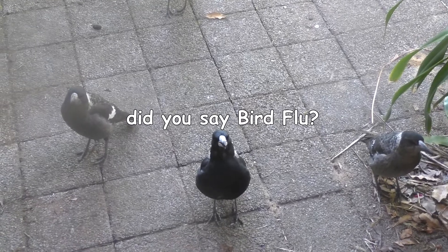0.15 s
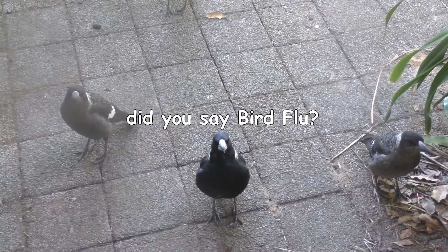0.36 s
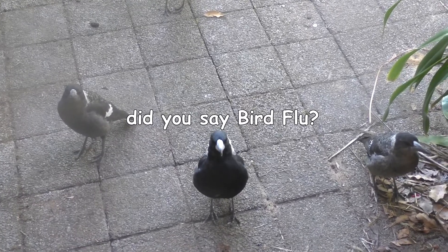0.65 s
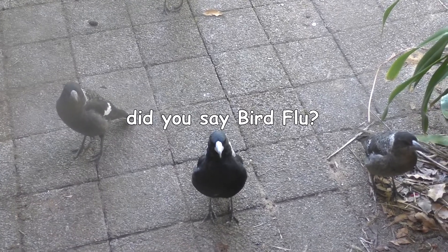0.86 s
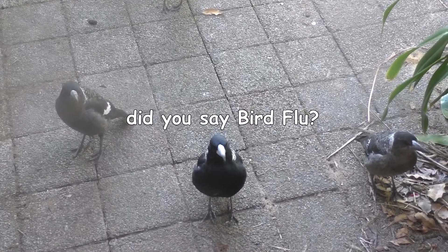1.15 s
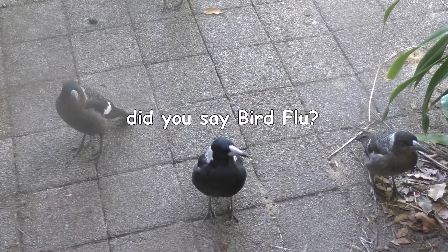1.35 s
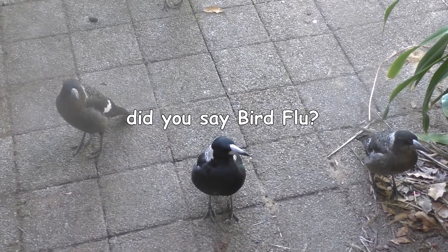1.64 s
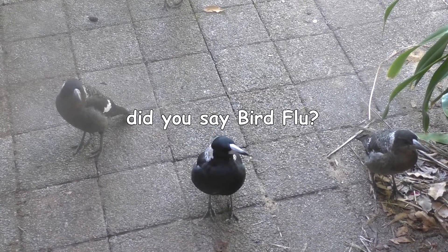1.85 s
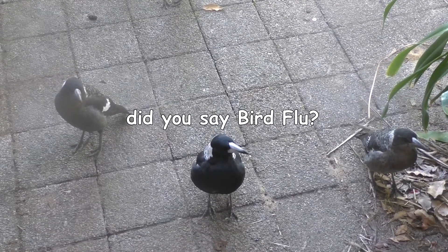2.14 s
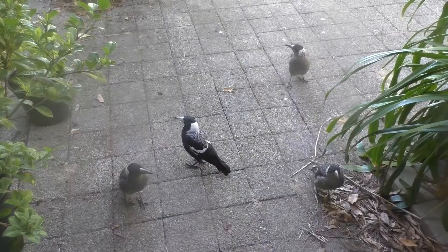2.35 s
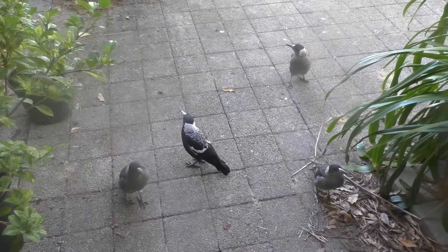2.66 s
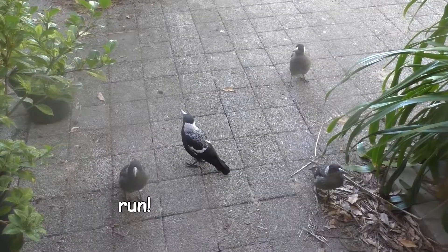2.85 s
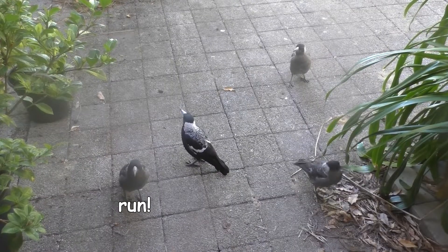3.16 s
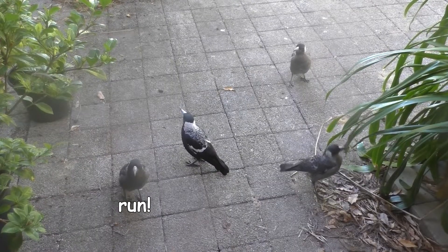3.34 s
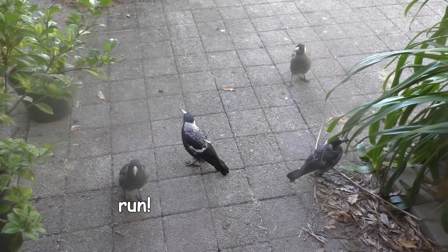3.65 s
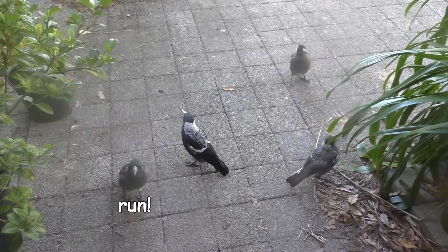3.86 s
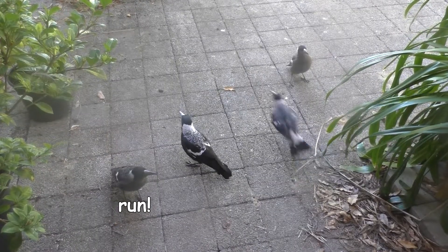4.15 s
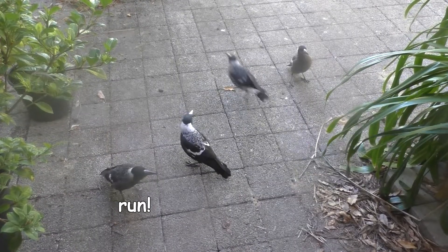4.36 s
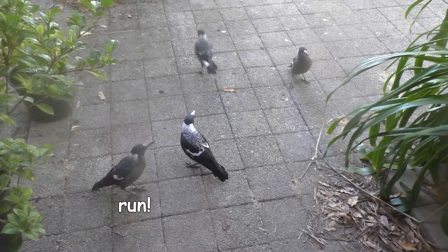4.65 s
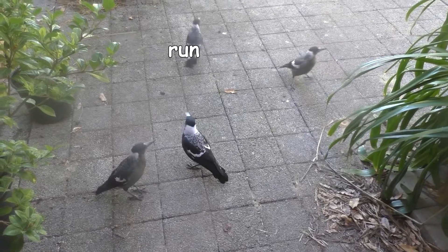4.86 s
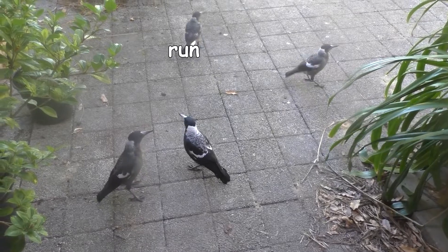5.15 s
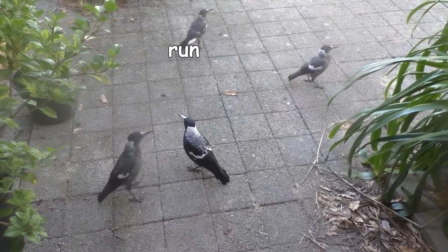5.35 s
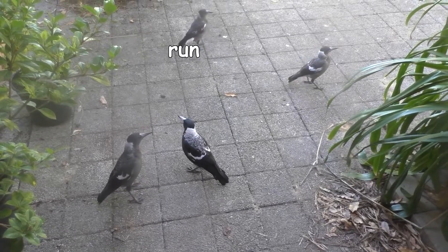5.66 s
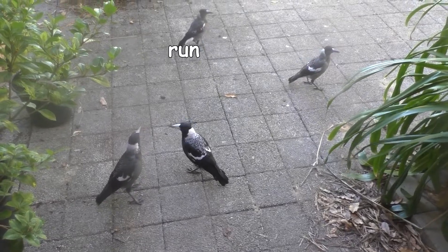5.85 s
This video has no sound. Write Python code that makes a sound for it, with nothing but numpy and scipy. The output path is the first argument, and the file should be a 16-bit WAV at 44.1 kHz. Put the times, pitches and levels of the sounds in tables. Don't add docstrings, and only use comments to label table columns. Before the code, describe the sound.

On a paved yard, a magpie already mid-song gives a loud fluty trill, then softer short whistles sliding lower, two close pitches beating together. Distant traffic and hiss rise after it, and a young bird gives one faint husky call. The sound cuts suddenly to a steady, low idling engine; dry leaves crackle and small twigs snap as a bird scuffles away, with faint distant whistles. Ordinary camera microphone, slightly grainy.

```python
import sys
import numpy as np
from scipy import signal
from scipy.fft import rfft, irfft, dct, next_fast_len
from scipy.io import wavfile
from scipy.ndimage import uniform_filter1d, map_coordinates

SR = 44100
rng = np.random.default_rng(int(sys.argv[2]) if len(sys.argv) > 2 else 0)


def output_pcm(signal):
    pcm = np.clip(np.atleast_2d(signal).T, -1, 1) * 32767
    wavfile.write(sys.argv[1], SR, np.round(pcm).astype(np.int16))


def amplitude_ratio(level_db):
    exponent = np.asarray(level_db, float) / 20
    return 10 ** exponent


N = 264776
CUT_S = 2.3
TOP_HZ = 15750


def unit(x):
    return x / np.sqrt(np.mean(x ** 2) + 1e-20)


def curves(rows, t):
    s, *cols = np.transpose(rows)
    return [np.interp(t, s, c) for c in cols]


def wobble(rate, size):
    knots = rng.standard_normal(int(size * rate / SR) + 4)
    return map_coordinates(knots, [np.arange(size) * rate / SR])


def filtered(x, response):
    m = next_fast_len(len(x) + 8192)
    return irfft(rfft(x, m) * response(np.fft.rfftfreq(m, 1 / SR)), m)[:len(x)]


def coloured(x, spectrum):
    f, db = np.transpose(spectrum)
    return unit(filtered(x, lambda hz: amplitude_ratio(np.interp(np.log(hz + 1), np.log(f), db))))


def rush(spectrum, patchy_db):
    z = signal.stft(rng.standard_normal(N + 512), nperseg=512)[2]
    field = uniform_filter1d(rng.standard_normal(z.shape), 3, 0)
    field = uniform_filter1d(field, 14, 1)
    patchy = signal.istft(z * amplitude_ratio(patchy_db * unit(field)), nperseg=512)[1][:N]
    return coloured(patchy, spectrum)


def add(out, s, x):
    part = out[round(s * SR):][:len(x)]
    part += x[:len(part)]


def tent(t, s, db, rise, fall):
    return db - np.where(t < s, rise * (s - t), fall * (t - s))


def after_cut():
    return np.clip((np.arange(N) / SR - CUT_S) / .004, 0, 1)


def throaty(source, throat, loose_db, count):
    place = np.linspace(0, count - 1, len(source))
    out = 0
    start_hz, end_hz, width, start_db, end_db = np.transpose(throat)[:, :, None]
    sign = (-1) ** np.arange(len(throat))[:, None]
    for k in range(count):
        u = k / (count - 1)
        chance = rng.standard_normal((2, len(throat), 1))
        hz = (start_hz + u * (end_hz - start_hz)) * (1 + loose_db * chance[0] / 200)
        gain = sign * amplitude_ratio(start_db + u * (end_db - start_db) + loose_db * chance[1])

        def tube(f):
            damping = 1.5j * f * width
            return (gain * (damping / (hz * hz - f * f + damping)) ** 2).sum(axis=0)

        share = np.clip(1 - abs(place - k), 0, 1)
        out = out + share * filtered(source, tube)
    return unit(out)


def note(rows, rasp, throat, coupling, gate, husky, fuzz_hz, loose_db):
    t = np.arange(rows[0][0], rows[-1][0], 1 / SR)
    hz, gap_hz, upper_db, lower_db = curves(rows, t)
    in_step_s, first_db, last_db, rough = coupling
    effort = amplitude_ratio(upper_db) + amplitude_ratio(lower_db)

    pull_s = .064
    outer_db = np.minimum(np.linspace(first_db, last_db, len(t)), -6)
    outer = amplitude_ratio(outer_db) * np.clip((t - pull_s) / 0.011, -1, 1)
    turn = np.exp(2j * np.pi * np.cumsum(hz) / SR)
    beats = np.cumsum(gap_hz) / SR
    beat = np.exp(-2j * np.pi * (beats - np.interp(in_step_s, t, beats)))
    swell = amplitude_ratio(upper_db) * (1 + outer / beat) + amplitude_ratio(lower_db) * beat * (1 + outer * beat)

    uneven = 0
    for rate, share in ((300, .85), (fuzz_hz, .4)):
        for turned in (1, 1j):
            uneven = uneven + share * turned * wobble(rate, size=len(t))
    swell = swell * (1 + husky * uneven)

    lead = hz - gap_hz * (lower_db.max() > upper_db.max() + 3)
    shaky = np.exp(2j * np.pi * np.cumsum(lead) / SR) * np.exp(.24j * wobble(300, size=len(t)))
    snaps = sum((shaky ** k).real * (k * lead < 16000) for k in range(2, 20))
    pulsing = (abs(swell) / effort) ** gate
    source = pulsing * ((1 - rough) * unit(snaps) + rough * rng.standard_normal(len(t)))

    rasp_level = np.minimum(amplitude_ratio(tent(t, *rasp)), amplitude_ratio(-3) * effort)
    overtones = throaty(source, throat, loose_db, count=8) * rasp_level
    since_start = t - t[0] + (t[0] == 0)
    fade = np.clip(np.minimum(since_start, t[-1] - t) / .006, 0, 1)
    return fade * (np.sqrt(2) * (swell * turn).real + overtones)


# time in seconds, upper voice in Hz, gap down to the lower voice in Hz,
# upper effort in dB, lower effort in dB.
TRILL_NOTE = [(0, 1575, 121.6, -38, -16), (.022, 1506, 113.4, -27, -15.5), (.034, 1433, 108, -13, -12.5),
              (.05, 1435, 93, -15, -14), (.066, 1471, 76, -26, -18.5), (.085, 1448, 70, -22.5, -20.5),
              (.13, 1430, 70.4, -31.5, -26), (.18, 1396, 73, -37, -35.5), (.215, 1370, 95, -53, -52)]
WHISTLE_NOTE = [(0.204, 1046, 107.3, -65, -46), (.218, 1049, 103.2, -42, -26),
                (0.236, 1045, 103.8, -28.5, -17.5), (.265, 1043, 109.8, -29, -15),
                (0.282, 1048, 107, -38, -16.5), (0.291, 1063, 96.7, -30, -34),
                (.308, 1093, 66.9, -23.5, -25.5), (0.334, 1076, 142, -64, -63), (.455, 1083, 152, -63, -77)]
DIP_NOTE = [(.475, 895, 111, -68, -62), (0.501, 885, 106, -36, -42), (0.516, 837, 82.4, -44, -34),
            (.53, 790, 74, -25.5, -40), (0.546, 788, 56.3, -39, -27.5), (.57, 756, 55, -41, -35),
            (.588, 746, 65, -50, -49)]
LIFT_NOTE = [(.6, 1046, 94, -50, -51), (.62, 1030, 89.4, -33.5, -34.5), (.64, 1064, 100.5, -28, -31),
             (.664, 1030, 99, -34, -32), (0.685, 1029, 99, -29, -54), (.698, 1040, 95, -40, -49),
             (0.709, 1017, 90, -63, -62)]
HOOK_NOTE = [(.7, 890, 165, -61, -54), (.712, 880, 168, -39, -35), (.723, 897, 179, -28.5, -36),
             (.732, 900, 185, -56, -52)]
SLIDE_NOTE = [(.729, 963, 80, -52, -46), (.737, 959, 75, -28, -25.5), (0.753, 943, 65, -37, -41),
              (0.761, 912, 80, -24.5, -40), (.775, 908.5, 88, -28.5, -27.5), (.795, 877, 100.2, -28, -37),
              (.895, 761.6, 73.7, -32.5, -31), (.907, 744, 68, -41, -37.5), (.955, 699, 58, -46.5, -48)]
TAIL_NOTE = [(.945, 718, 60, -65, -48), (.98, 730, 61.7, -38, -36.5), (1.005, 685, 59, -36.5, -44),
             (1.036, 712, 55, -41.5, -44.5), (1.055, 710, 65, -51, -59)]
# Hz at start, Hz at end, width in Hz,
# dB at start, dB at end.
OPENING_THROATS = [
    [(2060, 2000, 400, -7, -10.5), (2800, 2900, 260, -4, -15.5), (3720, 3800, 260, -1, -7),
     (4200, 4280, 180, -6, 1.5), (4600, 4600, 180, -4, 3), (5860, 5600, 150, -13, -20.5),
     (7300, 7250, 220, -29, -6.5), (8000, 7950, 200, -16, -4), (8450, 8750, 220, -6, -6),
     (10300, 9600, 700, -13.5, -9), (11400, 11100, 300, -10, -11), (14000, 13900, 500, -12.5, -18.5)],
    [(1980, 2100, 180, -12.5, -7), (2900, 3150, 160, -6, -8), (3760, 3250, 170, 6.5, 2.5),
     (5000, 4900, 290, -1.5, -8), (5580, 4600, 800, -9.5, -10), (8400, 8250, 810, -10.5, -10),
     (9800, 9300, 500, -5.5, -7), (11400, 11150, 570, -9.5, -8.5), (15000, 15000, 500, -18, -12.5)],
    [(2500, 2440, 94, -5, -4), (4900, 4800, 280, -1, -4), (8830, 8750, 100, 1, 1),
     (12500, 12100, 500, -7, 0)],
    [(2130, 2060, 86, -3, -9), (3100, 3500, 400, -18, 2), (3800, 3800, 200, -2, -18),
     (4230, 4150, 110, -7, -16), (5130, 5150, 240, -6.5, 7), (7100, 7250, 110, -14, -7),
     (9300, 8900, 740, -10, -4), (10200, 10100, 380, -10, -6), (11230, 11200, 320, 6, -15.5),
     (15350, 15350, 300, -14, -14)],
]
CLOSING_THROAT_SHAPES = [
    [(1790, 1800, 140, -6, -6), (2600, 2650, 200, -12, -12), (3500, 3530, 210, -2, -2),
     (5100, 5400, 250, -10, -10), (7230, 7230, 250, -10, -8), (9300, 9300, 400, -10, -10),
     (11200, 11300, 500, -2.5, -0.5), (13500, 13500, 900, -12, -13)],
    [(1825, 1700, 150, -8, -4), (2790, 2350, 260, -11.5, -7), (3190, 3200, 150, -1, 2),
     (3590, 3450, 150, 0.5, -3), (5160, 5000, 240, -3, -38), (6200, 6130, 130, -15, 7),
     (7200, 7200, 350, -1, -41), (9100, 8400, 220, -6, 11), (9440, 8900, 220, -4.5, -14),
     (10800, 10700, 300, -10, 1), (11500, 12000, 400, 3.5, -20.5), (12700, 13150, 260, -7, -10),
     (14100, 16000, 500, -9, -25)],
    [(1960, 1900, 150, -2, -6), (2650, 2600, 200, 2, -6), (3520, 3500, 200, -3, -5),
     (6100, 6000, 100, -3, -3), (8420, 8400, 170, -1, -4), (10300, 10200, 300, -8, -10)],
]
# a moment in seconds when they add up,
# outer sidebands in dB at start, the same at end, noise share from 0 to 1.
VOICE_COUPLING = [
    (.0417, -15, -2, .62),
    (.2628, -33, -33, .55),
    (.5349, -17, -17, .55),
    (.6309, -33, -33, .5),
    (.7205, -21, -21, .62),
    (.8361, -26, -22, .56),
    (.9875, -13, -13, .8),
    (2.0963, -9, -9, .8),
]
# loudest moment in seconds, peak in dB, swell in dB per second,
# fade in dB per second.
NOTE_RASP = [
    (.125, -39, 49, 200),
    (.238, -37.5, 450, 94),
    (.541, -52.5, 232, 328),
    (.655, -35, 250, 214),
    (.715, -41.5, 300, 30),
    (.84, -37.5, 21, 262),
    (.985, -54, 98, 200),
    (1.912, -34, 900, 15.5),
]
# start in seconds, length in seconds, pitch in Hz, level in dB,
# waver as a share of the pitch.
FAR_WHISTLES = [(1.35, .15, 6400, -64, .024), (1.33, .12, 5700, -65, .024), (1.47, .25, 4400, -58, .024),
                (1.59, .05, 7100, -62, .024), (4.635, .115, 3175, -53, .002), (3.72, .08, 1340, -47, .015),
                (3.93, .12, 1380, -46, .015), (4.3, .06, 1400, -49, .015), (3.8, .08, 2150, -51, .015),
                (3.94, .1, 1850, -51, .02), (4.04, .05, 4500, -48, .02), (5.8, .08, 1350, -50, .015),
                (1.06, .14, 2400, -66, .024), (1.17, .1, 4100, -65, .024)]


def magpies():
    out = np.zeros(N)
    song = [TRILL_NOTE, WHISTLE_NOTE, DIP_NOTE, LIFT_NOTE, HOOK_NOTE, SLIDE_NOTE, TAIL_NOTE]
    throats = OPENING_THROATS + CLOSING_THROAT_SHAPES
    for rows, rasp, throat, coupling in zip(song, NOTE_RASP, throats, VOICE_COUPLING):
        sung = note(rows, rasp, throat, coupling, gate=.6, husky=.11, fuzz_hz=480, loose_db=2)
        add(out, rows[0][0], sung)
    add(out, BEG_NOTE[0][0], begging())
    for s, length, hz, db, waver in FAR_WHISTLES:
        size = round(length * SR)
        pitch = hz * (1 + waver * wobble(160, size=size))
        whistle = np.sin(2 * np.pi * np.cumsum(pitch) / SR)
        add(out, s, amplitude_ratio(db) * 1.5 * np.hanning(size) ** .5 * whistle)
    return out


# time in seconds, upper voice in Hz, gap down to the lower voice in Hz,
# upper effort in dB, lower effort in dB.
BEG_NOTE = [(1.888, 1250, 88, -66, -54), (1.91, 1360, 82, -48, -40.5), (1.95, 1462, 72.4, -49, -41),
            (2.03, 1450, 77.4, -48, -41.5), (2.062, 1346, 76, -51.5, -41.5), (2.105, 1465, 78.6, -42, -40),
            (2.2, 1427, 68, -44.5, -40), (2.23, 1330, 68, -55, -39), (2.258, 1250, 70, -68, -56)]
# Hz at start, Hz at end, width in Hz, dB at start, dB at end.
YOUNG_THROAT = [(950, 950, 200, -8, -12), (1750, 1700, 140, -4, -3), (2028, 2050, 130, 1, -4),
                (2420, 2380, 190, 2, 1), (3360, 3400, 260, -8.5, -7), (4300, 4200, 450, -4, -8),
                (5620, 5350, 390, -2, -3), (6320, 6400, 340, -6, -11), (7900, 8000, 480, -4, -5.5),
                (10100, 10000, 530, -15, -12), (11200, 11050, 330, -8.5, -8), (12200, 12100, 500, -17, -18)]
# time in seconds, treble level in dB.
BEAK_OPENING = [(1.9, -19.5), (1.91, 0), (2.075, 0.5), (2.086, 3.5), (2.12, 0), (2.17, -6), (2.182, -3),
                (2.215, -4), (2.232, -14)]


def begging():
    call = note(BEG_NOTE, NOTE_RASP[-1], YOUNG_THROAT, VOICE_COUPLING[-1],
                gate=.22, husky=.5, fuzz_hz=800, loose_db=2.2)
    treble = filtered(call, lambda hz: hz > 3000)
    t = BEG_NOTE[0][0] + np.arange(len(call)) / SR
    opening_db, = curves(BEAK_OPENING, t)
    return call + treble * (amplitude_ratio(opening_db) - 1)


def walls(x):
    u = np.arange(SR // 4) / SR
    tail = rng.standard_normal(len(u)) * amplitude_ratio(-60 * u / 0.48) * (u > .006)
    return signal.fftconvolve(x, tail / np.linalg.norm(tail))[:N]


# time in seconds, scuffle level in dB, crackle level in dB.
KICKS = [(3.3, -73, -50), (3.5, -74, -44), (3.6, -47, -43.5), (3.76, -50, -54), (3.914, -38.5, -38),
         (4.112, -43, -33.5), (4.25, -58, -53), (4.34, -47, -54), (4.58, -50.5, -50), (5.62, -80, -68),
         (5.78, -41, -56), (5.98, -71, -66)]
SCUFFLE_SLOPES = (88, 50.5)
CRACKLE_SLOPES = (168, 195)
# pitch in Hz, level in dB per Hz.
SCUFFLE_COLOUR = [(710, -41), (1200, -1.5), (2570, 0.5), (3550, -0.5), (4840, 2), (9020, -6), (15600, -18)]
CRACKLE_COLOUR = [(4000, -48), (8000, 3), (11000, 4.5), (14000, -4), (16000, -14)]
TWIG_COLOUR = [(5000, -40), (9000, 1), (11000, 3), (14000, -1), (16000, -10)]
# time in seconds, peak in dB, time to die by 60 dB in seconds.
TWIG_SNAPS = [(3.298, -31.5, .008), (3.357, -42, .006), (3.3863, -34.5, 0.0086), (3.4475, -39.5, .06),
              (3.506, -32.5, .04), (3.606, -36.5, .06), (3.924, -36, .03), (4.075, -40, .01),
              (4.117, -40, .01), (4.092, -30, .03), (4.1452, -36, .01), (4.151, -34, .01),
              (4.265, -46, .008), (4.3027, -36, .015), (4.618, -43, .01)]


def grains(share):
    noise = rng.standard_normal(N)
    struck = rng.random(N) < share
    force = np.minimum(rng.exponential(1, N), 1.6)
    return noise * (.5 + struck * 1.1 * force)


def leaves():
    t = np.arange(N) / SR
    scuffle = np.sqrt(sum(amplitude_ratio(2 * tent(t, s, db, *SCUFFLE_SLOPES)) for s, db, _ in KICKS))
    crackle = np.sqrt(sum(amplitude_ratio(2 * tent(t, s, db, *CRACKLE_SLOPES)) for s, _, db in KICKS))
    clumps = amplitude_ratio(2.8 * wobble(25, size=N)) * coloured(grains(0.015), SCUFFLE_COLOUR)
    clumps = clumps + 1.1 * rush(SCUFFLE_COLOUR, patchy_db=5)
    out = scuffle * unit(clumps)
    out = out + crackle * amplitude_ratio(-2.5) * coloured(grains(0.013), CRACKLE_COLOUR)
    u = np.arange(SR // 20) / SR
    for s, db, t60 in TWIG_SNAPS:
        snap = coloured(rng.standard_normal(len(u)), TWIG_COLOUR)
        add(out, s, amplitude_ratio(db) * snap * amplitude_ratio(-60 * u / t60))
    return out


# time in seconds, firing rate in Hz, load in dB,
# bark of the upper orders in dB.
ENGINE_IDLE = [(2.3, 33.15, 2.5, -1), (2.47, 34.94, -2.5, 2), (2.75, 36.13, 0, -0.5), (3.0, 37.09, -2, 0.5),
               (3.3, 37.73, 1, -2.5), (3.42, 37.7, 1.5, 8), (3.71, 37.49, 0.5, 0), (3.86, 37.3, -0.5, 3.5),
               (4.02, 36.8, 0.5, 0.5), (4.26, 36.8, -6.5, 3), (4.5, 35.84, 1, 2), (5.0, 35.8, 1, 1.5),
               (5.72, 35.78, 0.5, -2.5), (6.0, 36.0, 2, 2.5)]
# level in dB, growth with load in dB per dB.
EXHAUST_ORDERS = [(-45, 0.7), (-39, -0.4), (-37, 3), (-85, 7), (-45.5, 1.6), (-45, -0.16), (-77, 6),
                  (-57, -0.5)]


def engine():
    t = np.arange(N) / SR
    hz, load_db, bark_db = curves(ENGINE_IDLE, t)
    shaft = 2 * np.pi * np.cumsum(hz) / SR
    hum = np.zeros(N)
    for k, (db, growth) in enumerate(EXHAUST_ORDERS, 3):
        level_db = db + growth * load_db + bark_db * (k in (7, 8)) + 1.6 * wobble(6, size=N)
        hum += amplitude_ratio(level_db) * np.sin(k * shaft + .5 * wobble(7, size=N))
    return np.sqrt(2) * hum * after_cut()


# pitch in Hz, level in dB per Hz.
TRAFFIC_COLOURS = [
    [(13, -71), (22, -44), (48, -22), (75, -30), (99, 3), (183, 5), (287, 2.5), (394, -4.5), (493, -29),
     (520, -15.5), (680, -81), (1140, -120)],
    [(15, -44), (25, -27), (75, -14.5), (100, -4), (180, -0.5), (300, -3.5), (370, -13), (420, -32),
     (520, -42), (600, -84)],
]
HISS_COLOURS = [
    [(420, -22), (650, 2), (900, 5), (1500, 2.5), (2500, -2), (4500, -2), (6300, -10.5), (10000, -6.5),
     (15600, -14)],
    [(880, -9.5), (1500, 2), (1590, -6), (2110, -1.5), (2730, -2), (3130, -4), (3380, -4), (10100, -5.5),
     (15600, -19)],
]
TYRE_COLOUR = [(260, -75), (450, -35), (510, -14.5), (588, 1.5), (706, 4), (848, -6.5), (1000, 0.5),
               (1160, -7), (1700, -12.5), (2210, -14), (3740, -120)]
ROAD_COLOUR = [(330, -60), (400, 0), (480, -2), (560, -7.5), (660, -67)]
DRONE_COLOUR = [(15, -24), (30, -13), (60, -7), (90, -5), (130, -4), (200, -48)]
# time in seconds, level in
# dB.
ROAD_LEVEL = [(0, -79), (1.1, -65), (2.3, -63), (3.3, -58.5), (4.6, -81), (6, -72)]
# time in seconds, gain in dB.
GAIN_RECOVERY = [(0, -11), (.08, -8.5), (.42, -9.5), (.6, -5.5), (1.07, -10.5), (1.3, -4), (1.5, -2.5),
                 (1.65, -1.5), (1.72, 0.5), (1.8, -0.5), (1.9, -0.5), (2.3, 1)]
# time in seconds, strength in dB.
BREEZE_STRENGTH = [(2.3, -0.5), (3.38, 0), (3.6, 1), (4.04, 7), (4.31, 4), (4.72, 4), (5.67, 2), (6.0, 3.5)]
# levels in dB, and how much each follows the gain or breeze
# in dB per dB; early is before the scene changes, late is after.
EARLY_LEVELS = (-39.5, -58, -51)
EARLY_FOLLOW = (1.36, 0.93, 0.85)
LATE_LEVELS = (-30.5, -49, -49)
LATE_FOLLOW = (-0.54, 0.067, 0.89)


def yard():
    t = np.arange(N) / SR
    after = after_cut()
    before = 1 - after
    recovery_db, = curves(GAIN_RECOVERY, t)
    breeze_db, = curves(BREEZE_STRENGTH, t)
    road_db, = curves(ROAD_LEVEL, t)
    early = np.outer(EARLY_FOLLOW, recovery_db) + np.reshape(EARLY_LEVELS, (3, 1))
    late = np.outer(LATE_FOLLOW, breeze_db) + np.reshape(LATE_LEVELS, (3, 1))
    traffic_db, tyres_db, hiss_db = after * late + before * early

    traffic = before * rush(TRAFFIC_COLOURS[0], patchy_db=3.0)
    traffic = traffic + after * amplitude_ratio(-4.5) * rush(TRAFFIC_COLOURS[1], patchy_db=-1.0)
    tyres = amplitude_ratio(.9 * wobble(4, size=N)) * rush(TYRE_COLOUR, patchy_db=3.5)
    hiss = before * rush(HISS_COLOURS[0], patchy_db=2.1) + after * rush(HISS_COLOURS[1], patchy_db=2.1)
    road = amplitude_ratio(road_db) * rush(ROAD_COLOUR, patchy_db=5)
    drone = amplitude_ratio(-57.5 + 0.6 * recovery_db) * before * rush(DRONE_COLOUR, patchy_db=2.5)
    return amplitude_ratio(traffic_db) * traffic + amplitude_ratio(tyres_db) * tyres + amplitude_ratio(hiss_db) * hiss + road + drone


def splice():
    out = np.zeros(N)
    u = np.arange(SR // 10) / SR
    add(out, CUT_S, -amplitude_ratio(-33 - 60 * u / .06) * np.sin(2 * np.pi * 55 * u))
    return out


def scene():
    birds = magpies()
    echo = amplitude_ratio(-19) * walls(birds)
    return (birds + echo + yard() + engine() + splice() + leaves())[None]


STARVED_FRAMES = [.343, .45, .535, .983, 1.751, 1.815, 2.199, 2.754, 2.839, 2.882, 3.415, 3.586, 3.65,
                  4.098, 4.439, 4.823, 5.335, 5.42, 5.89]
GENTLE_FRAMES = [.45, .535, 2.199, 4.823, 5.42]
# start in seconds, number of frames, highest Hz kept.
DEEP_SHORTAGES = [(.62, 2, 12500), (.834, 2, 15700), (2.146, 1, 11500), (2.327, 1, 10000), (2.54, 2, 9500),
                  (4.375, 2, 9000), (4.908, 2, 10000), (5.719, 2, 10500)]


def starved(x):
    frame = 1882
    gentle_step, usual_step, deep_step = 2.9, 3.7, 3.45
    out = x.copy()
    window = np.sin(np.pi * (np.arange(frame) + .5) / frame)
    hz = np.arange(frame) * SR / 2 / frame
    frames = [(s, gentle_step if s in GENTLE_FRAMES else usual_step, TOP_HZ) for s in STARVED_FRAMES]
    for s, count, top_hz in DEEP_SHORTAGES:
        frames += [(s + k * frame / 2 / SR, deep_step, top_hz) for k in range(count)]
    for s, step, top_hz in frames:
        start = round(s * SR) - frame // 2
        lines = dct(x[start:start + frame] * window, norm="ortho")
        local_power = uniform_filter1d(lines ** 2 * (hz > 900), 141)
        size = 1.12 * step * np.sqrt(abs(local_power) + 1e-20)
        kept = size * np.round(lines / size) * (hz < top_hz)
        lost = (lines - kept) * (hz > 850)
        out[start:start + frame] -= .95 * window * dct(lost, type=3, norm="ortho")
    return out


def top_cut(x):
    return signal.sosfilt(signal.butter(12, 15750, fs=SR, output="sos"), x)


def record(dry):
    thinned = starved(dry[0])
    mix = filtered(thinned, lambda hz: hz < TOP_HZ)[None]
    return top_cut(mix)


dry = scene()
out = record(dry)
output_pcm(out)
```